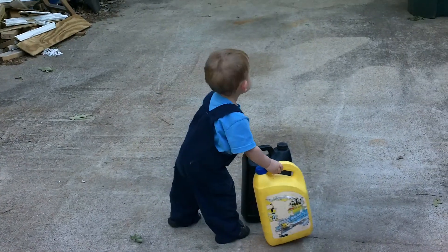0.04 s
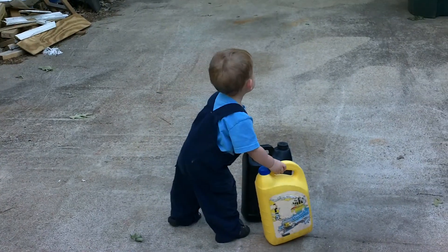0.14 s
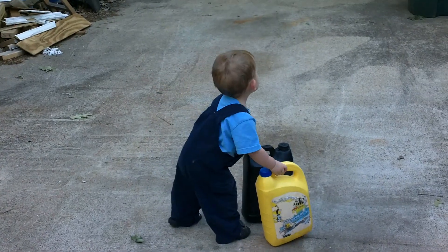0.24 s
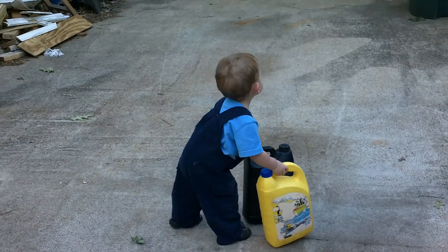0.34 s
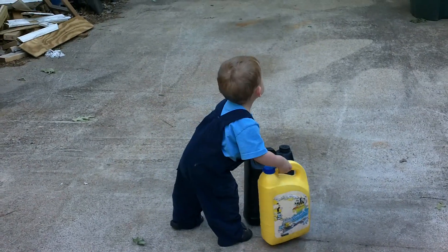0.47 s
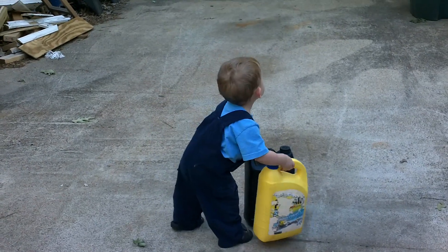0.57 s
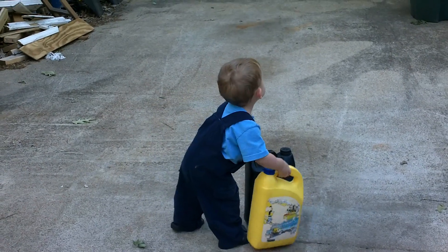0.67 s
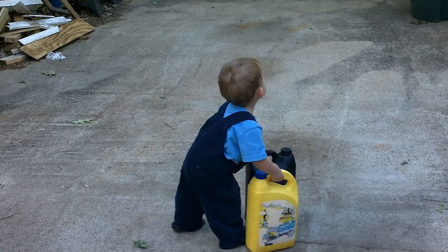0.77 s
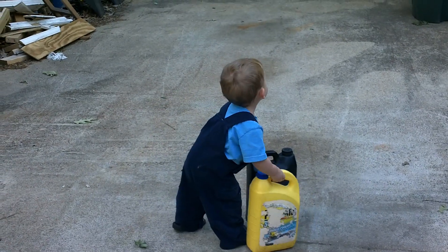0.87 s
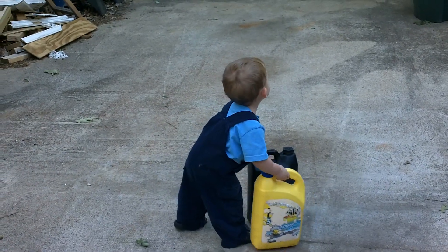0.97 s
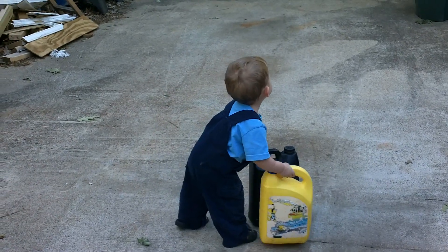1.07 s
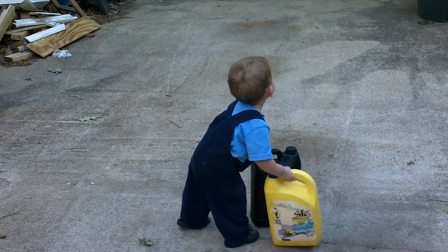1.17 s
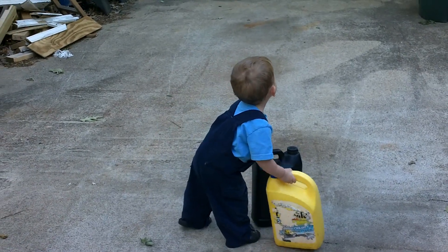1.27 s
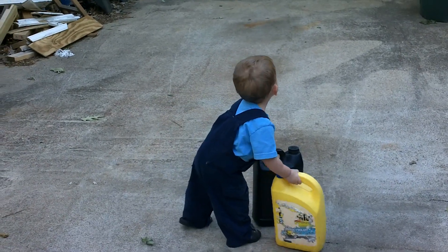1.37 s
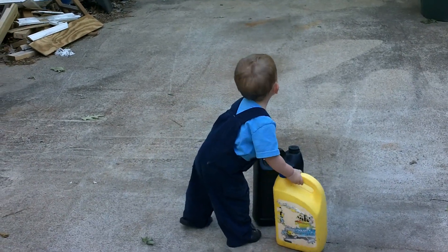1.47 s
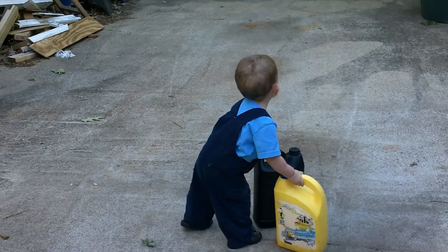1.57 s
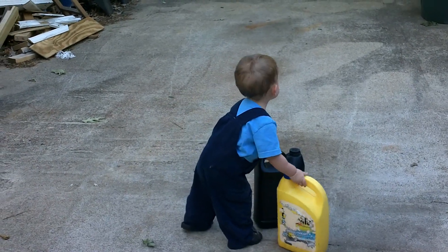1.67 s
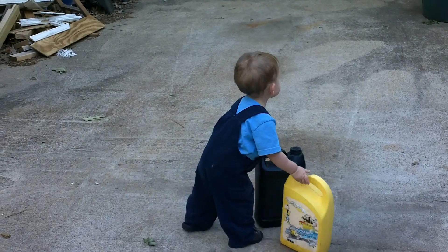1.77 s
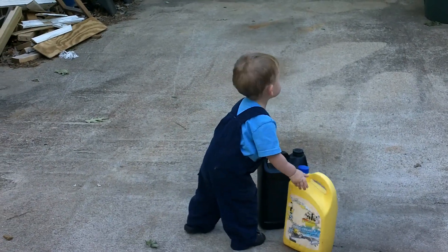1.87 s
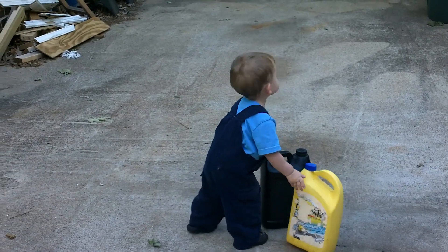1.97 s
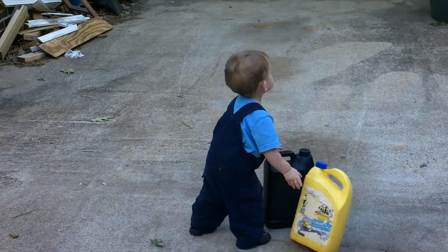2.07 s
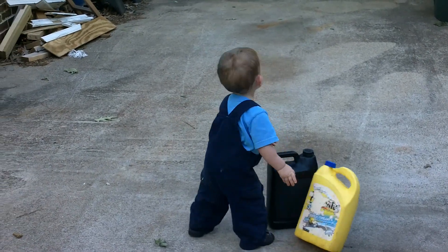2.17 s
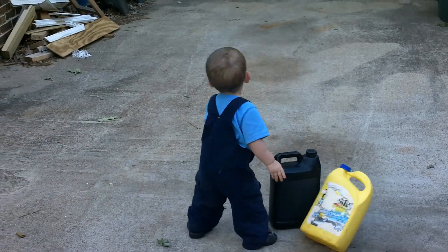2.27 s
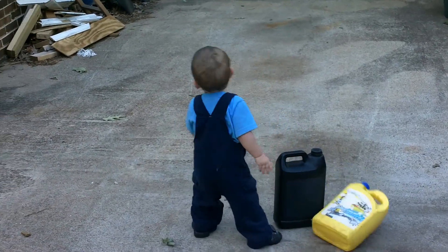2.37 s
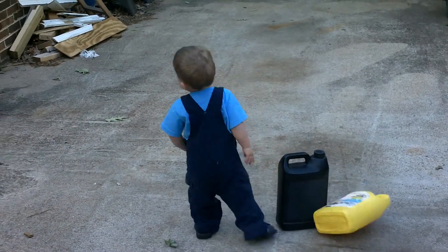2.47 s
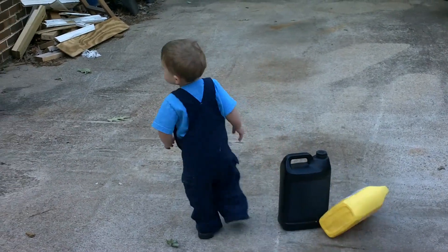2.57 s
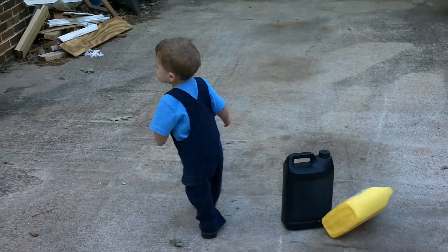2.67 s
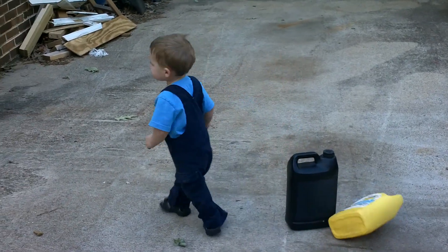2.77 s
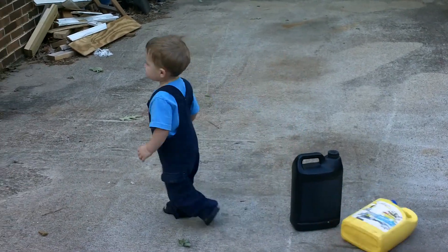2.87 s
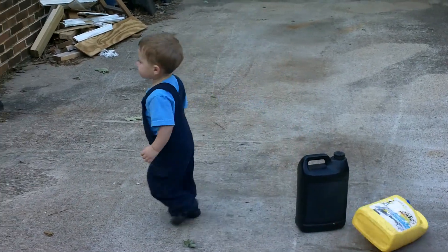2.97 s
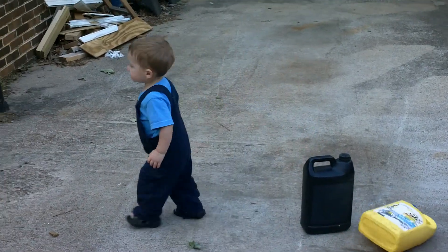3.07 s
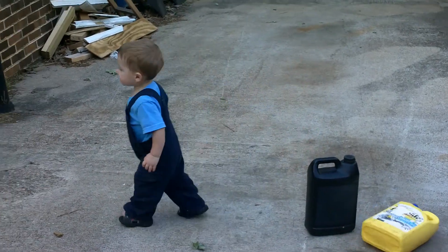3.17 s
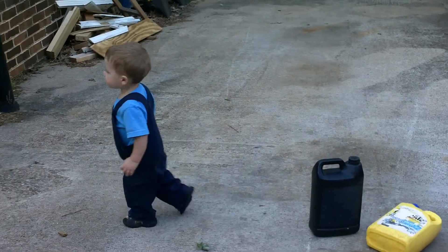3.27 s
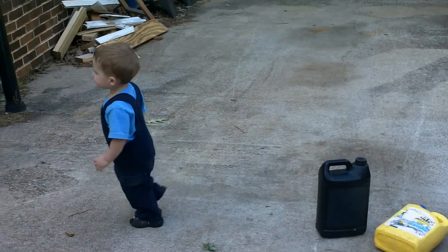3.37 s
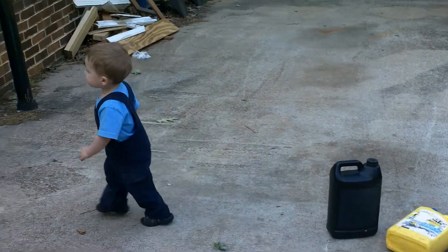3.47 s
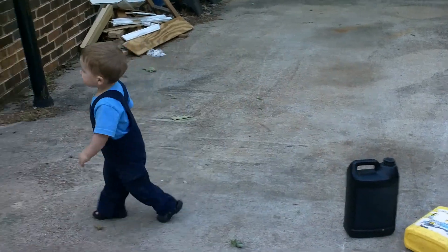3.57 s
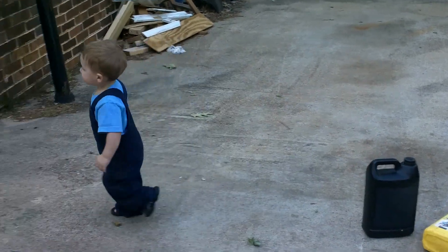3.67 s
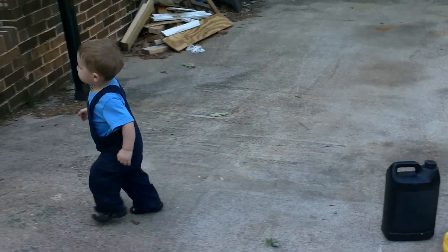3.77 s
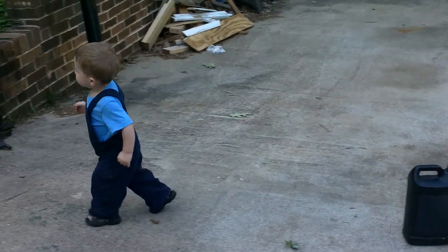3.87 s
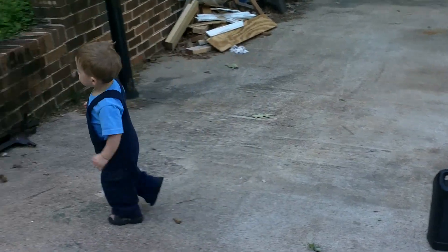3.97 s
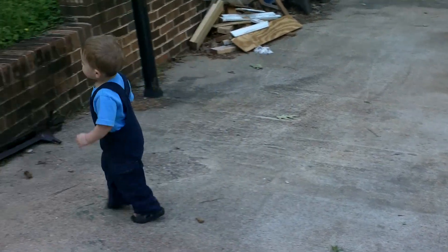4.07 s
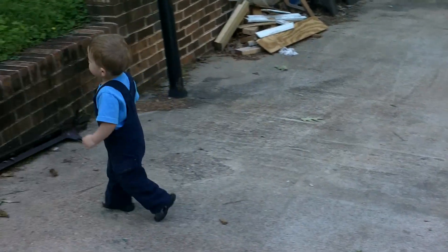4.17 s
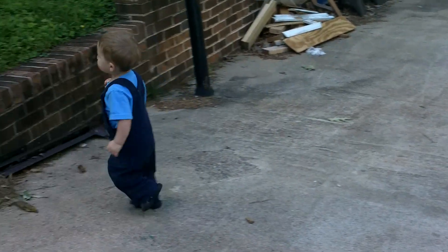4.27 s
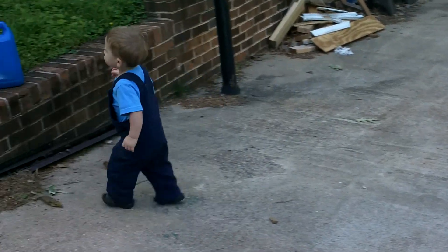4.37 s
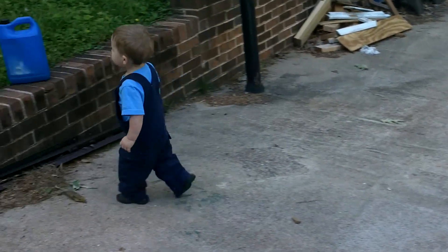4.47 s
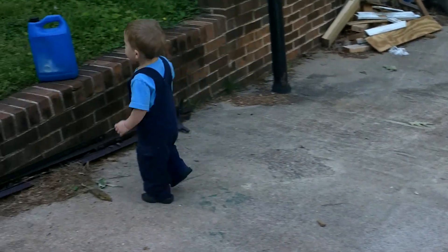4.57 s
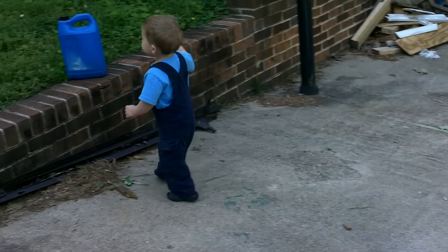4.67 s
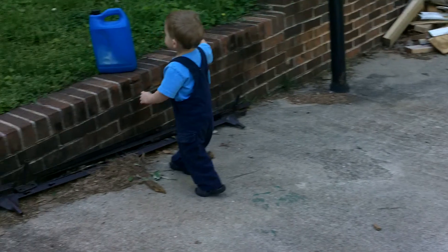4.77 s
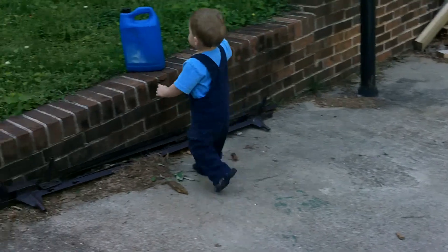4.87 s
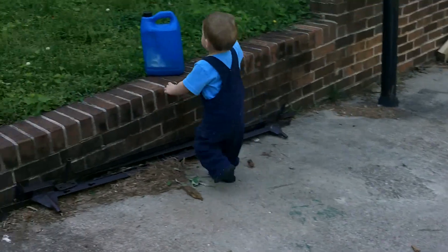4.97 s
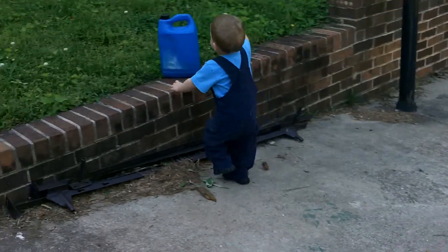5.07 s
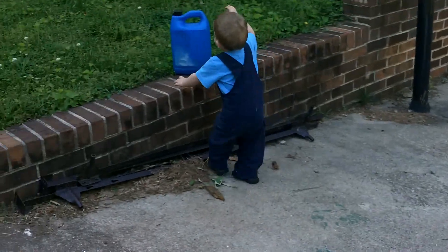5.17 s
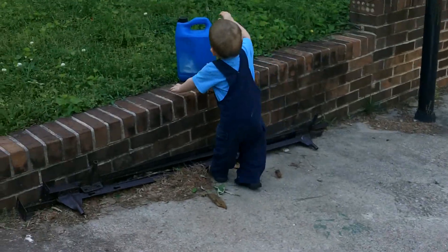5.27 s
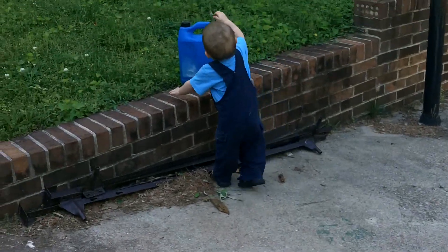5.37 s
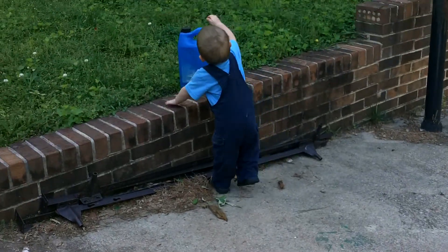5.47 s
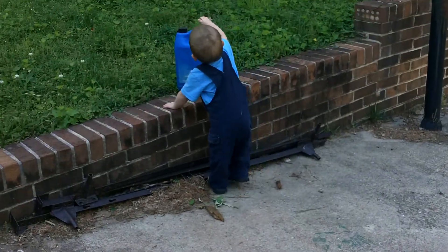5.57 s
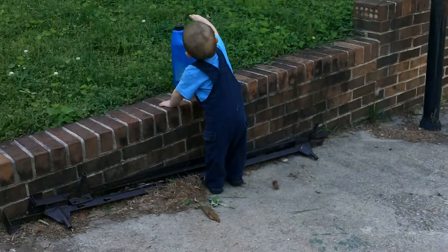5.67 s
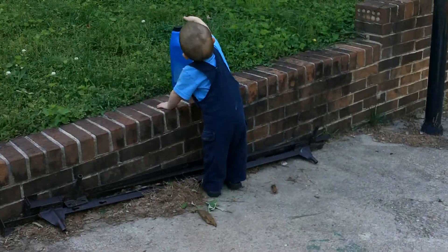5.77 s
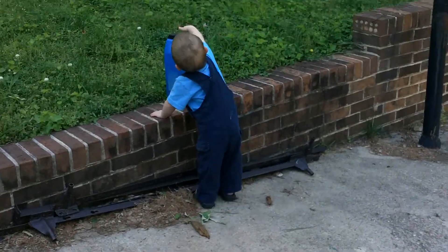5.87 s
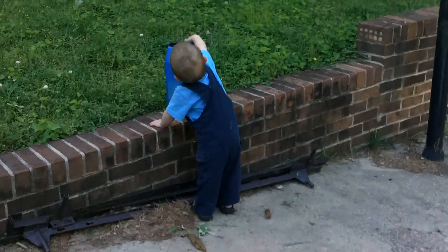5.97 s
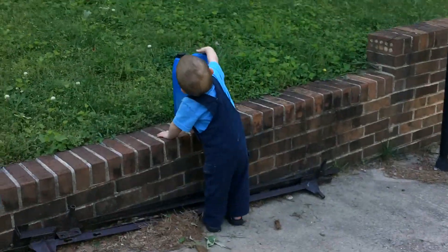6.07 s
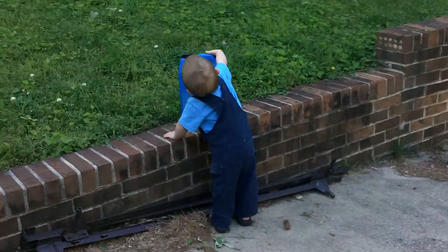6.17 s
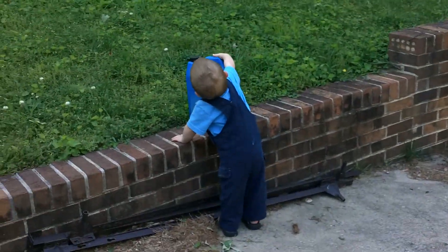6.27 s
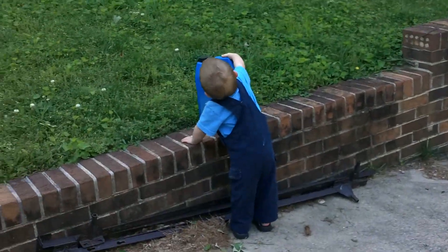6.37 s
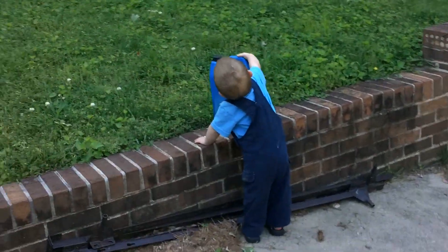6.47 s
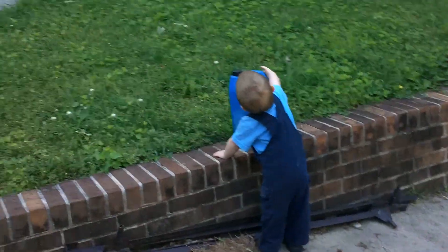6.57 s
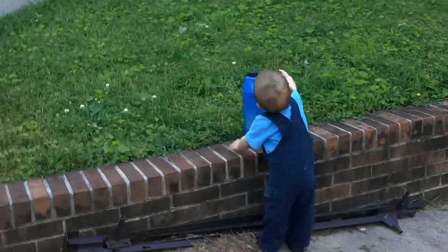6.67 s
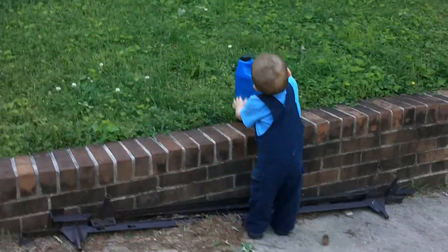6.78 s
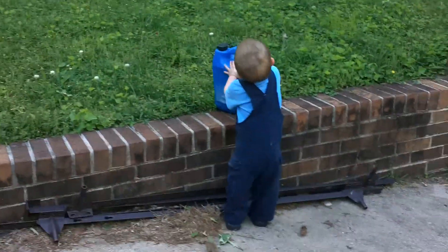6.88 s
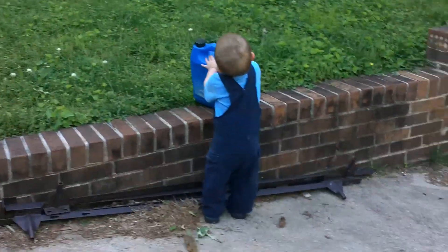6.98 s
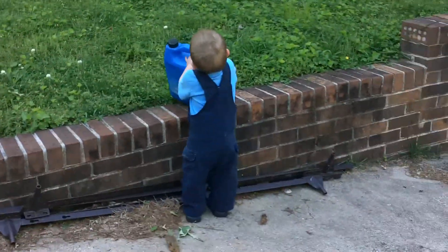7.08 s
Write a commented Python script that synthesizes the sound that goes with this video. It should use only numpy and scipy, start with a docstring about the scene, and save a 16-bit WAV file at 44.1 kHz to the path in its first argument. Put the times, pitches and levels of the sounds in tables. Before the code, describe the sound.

A quiet suburban yard, with distant low wash, faint drone and light hiss. In the first half second there is a soft shoe scuff and quick high bird chirps. At about 0.9 s an empty plastic jug is set down with a dull hollow double knock, a bird whistling just before; a lighter knock comes at 1.35, shoe ticks around 1.2 to 1.8, and very soft low bumps from 1.9 to 2.4. At 2.6 the jug topples: a loud sharp crack with hollow shell ring, then rapid clattering bounces, another strong hit at 3.05, and taps rocking down to nothing by 4.0, with fine grit scraping. Short echoes return from a brick wall. From 4 to 6 s small dry footsteps and scuffs are spaced out, while faint birds twitter and whistle, thinning near 6, then busier to the end. Two barely audible bumps close around 7.0. A small camera microphone hears everything.

```python
"""A concrete drive in a suburb: an empty plastic jug is set down, tips over, bounces and rocks to rest.
Each blow is a noisy crack that rings the jug's shell, its flat side walls and the air inside.
Small shoes tick and grit scrapes as noise bursts; a brick wall throws the blows and ticks back.
Far off, birds whistle as gliding sines over a wash and hiss of shaped noise and a low drone.
A small camera microphone with dips in its response hears it all."""
import sys
import numpy as np
from scipy import signal
from scipy.fft import rfft, irfft, next_fast_len
from scipy.io import wavfile
from scipy.ndimage import uniform_filter1d

SR = 44100
rng = np.random.default_rng(int(sys.argv[2]) if len(sys.argv) > 2 else 0)


def materialize(psi):
    """Save the field psi as 16-bit PCM at rate SR to the path in sys.argv[1].

    A 1-D psi becomes a single channel; in a 2-D psi each row is a channel.
    """
    bounded = np.clip(np.atleast_2d(psi).T, -1, 1)
    quanta = np.round(bounded * 32767).astype(np.int16)
    wavfile.write(sys.argv[1], SR, quanta)


N = 314825
WALL_JUG_DB, WALL_TICK_DB = -16, -11  # brick wall echo against the direct sound


def gain_of(db):
    """Decibels to gain."""
    return 10 ** (np.asarray(db) / 20)


def evened(x):
    """Scales to rms 1."""
    return x / np.sqrt(np.mean(x ** 2) + 1e-20)


def unit_energy(x):
    """Scales so that the squares sum to 1."""
    return x / np.linalg.norm(x)


def read(points, hz):
    """Reads a spectrum on a log-frequency axis."""
    f, value = np.transpose(points)
    return np.interp(np.log(hz + 1), np.log(f + 1), value)


def add(mix, s, sound):
    """Mixes a sound in at time s."""
    part = mix[max(round(s * SR), 0):][:len(sound)]
    part += sound[:len(part)]


def background():
    """Distant wash and hiss: random short-time spectra with faint drifting patches, and the drone."""
    # colour of the background before its slow changes: distant wash and, above about 9 kHz,
    # steady recorder hiss: [f/Hz, level/dB per Hz]
    background_colour = [(20, -71), (40, -70.5), (90, -75), (180, -81), (380, -87.5), (750, -86),
                         (1500, -91), (2600, -96.5), (3700, -100), (5000, -105), (6500, -116), (8000, -124),
                         (10000, -117.5), (15000, -115), (15700, -140)]
    # slow changes of the background:
    # [t/s, change of all below 8 kHz/dB, change of a broad band round 650 Hz/dB, drone level/dB]
    weather = [(0, 2, 0.5, -49), (1, 1, 1, -45.5), (2, 3, 0.5, -52), (2.5, -0.5, 3.5, -49.5),
               (3.5, 3.5, 1.5, -56), (4.3, 3.5, 3.5, -73), (5, 4.5, 1.5, -69), (6, 2, 2.5, -57),
               (6.5, 3, -1, -72), (7.14, 4, -5, -68)]
    hop = 512
    frames, hz = N // hop + 5, np.fft.rfftfreq(2048, 1 / SR)[:, None]
    real, imaginary, patches = rng.standard_normal((frames, 1025, 3)).T
    patches = evened(uniform_filter1d(uniform_filter1d(patches, 20, 0), 8, 1))

    s, *columns = np.transpose(weather)
    frame_s = np.arange(frames) * hop / SR
    whole_db, swell_db, drone_db = (np.interp(frame_s, s, column) for column in columns)
    swell = np.exp(-np.log2(hz / 650 + 1e-3) ** 2 / 2.3) * swell_db
    level_db = read(background_colour, hz) + whole_db * (hz < 8000) + swell + 0.75 * patches
    spectra = (real + 1j * imaginary) * gain_of(level_db)
    air = signal.istft(spectra, nperseg=2048, noverlap=2048 - hop)[1][:N] * np.sqrt(SR / 2048)
    return air + drone() * gain_of(np.interp(np.arange(N), np.arange(frames) * hop, drone_db))


def drone():
    """A steady low tone with slow random wobble of level and phase, rms 1."""
    drone_hz, width_hz = 46.3, 5  # width of each of two equal smoothing stages
    r = np.exp(-np.pi * width_hz / SR)
    wobble = rng.standard_normal((2, N))
    for _ in range(2):
        wobble = signal.lfilter([1 - r], [1, -r], wobble)
    envelope = 3.1 + evened(wobble)[0] + 1j * evened(wobble)[1]
    return evened((envelope * np.exp(2j * np.pi * drone_hz * np.arange(N) / SR)).real)


def ring(t, hz, t60, rise=0.):
    """One dying mode, with a soft start."""
    return gain_of(-60 * t / t60) * (1 - np.exp(-t / (rise + 1e-5))) * np.sin(2 * np.pi * hz * t)


def burst(bright_db, length, snap):
    """A sharp contact in a gritty rush of smaller ones: bare force and its crack, both of unit energy."""
    # colour of the contact crack, before tilt: [f/Hz, level/dB]
    crack_colour = [(200, -13), (700, -4), (1500, 6), (3000, 7), (5000, 0.5), (6800, -11), (8200, -20.5),
                    (10500, -20.5), (14000, -39), (17000, -22)]
    t = np.arange(4096) / SR
    uneven = gain_of(4.4 * rng.standard_normal(4096))
    grit = rng.standard_normal(4096) * uneven * np.exp(-t / max(length, .001))
    grit *= 1 - np.exp(-t / 0.00019)
    grit[30] += snap * np.abs(grit).max()

    hz = np.fft.rfftfreq(4096, 1 / SR)
    octaves = np.clip(np.log2(hz / 2500 + 1e-3), -1, 2.2)
    log_gain = np.log(gain_of(read(crack_colour, hz) + bright_db * octaves))
    full = np.concatenate([log_gain, log_gain[-2:0:-1]])
    causal = np.exp(np.conj(signal.hilbert(full)))[:2049]  # minimum phase: nothing sounds before the contact
    crack = irfft(rfft(grit) * causal)
    dull = uniform_filter1d(crack, size=8)
    crack = dull + (crack - dull) * 0.97 * np.exp(-t / (2.9 * length))  # the treble dies first
    return unit_energy(grit), unit_energy(crack)


def with_yard(sound, wall_db):
    """The sound, its echo smeared by the rough brick wall, and a thin outdoor tail of softened treble."""
    wall_delay_s, tail_db = 0.0353, -16.5
    t = np.arange(SR // 3) / SR
    taps = rng.choice([-1., 1.], len(t)) * (rng.random(len(t)) < .3)
    late = t - wall_delay_s
    bricks = taps * np.exp(-np.abs(late) / np.where(late > 0, .008, .0008))
    tail = signal.lfilter([1], [1, -.4], taps) * gain_of(-60 * t / 0.28) * (t > .006)
    response = gain_of(wall_db) * unit_energy(bricks) + gain_of(tail_db) * unit_energy(tail)
    response[0] = 1  # direct sound
    return signal.fftconvolve(sound, response)


def blows():
    """All blows: main blows, soft bumps (the last two from a second jug) and rocking taps, as rows with the
    columns of main."""
    # blows of the jug from setting down to rocking, with one broad echoing burst after the fall:
    # [t/s, crack level/dB, crack tilt/dB per octave,
    # shell level/dB, air boom level/dB, side wall level/dB, most struck side pitch f/Hz]
    main = [(0.8758, -8.5, -6.5, -4.5, -27, -12.5, 339), (0.8949, -17.5, -5, -11, -55, -30.5, 283),
            (1.3551, -13.5, 2, -8.5, -23, -16, 260), (2.5761, -15, 5, -8, -23, -44, 312),
            (2.5814, 5, 4.5, -6, -36, -26, 290), (2.5881, 9.5, -3, 4.5, -29, -36, 284),
            (2.6101, -14, 9, 0, -15, -21, 297), (2.7223, -15, 8, -2, -14.5, -51, 204),
            (2.7345, -7, 5, -5, -42, -20.5, 305), (2.7863, -23, 1, -11.5, -18, -28, 273),
            (2.861, -17.5, -0.5, -12.5, -32, -37, 274), (2.8994, -20, -1.2, -16, -31, -30, 280),
            (2.9246, -37, 11, -33, -25, -38, 270), (2.9355, -18, 2, -17.5, -26, -42, 288),
            (2.9573, -14.5, .4, -28, -29.5, -41, 200), (2.9765, -23, 3, -28, -53, -37.5, 258),
            (3.0305, -17, 1.9, -14, -50, -45, 336), (3.046, 4, 3.5, 0.5, -22, -32.5, 232),
            (3.1317, -16, 7.5, -9.5, -21, -32, 275), (3.1837, -13.5, -4, -11.5, -20.5, -34, 250),
            (3.2245, -14, -5, -11.5, -25, -47, 204), (3.2615, -17, -0.5, -14.5, -33, -45, 240),
            (3.2952, -12.5, 4.5, -22, -23.5, -32, 205), (3.3066, -7.5, 0.3, -5.5, -19.5, -31.5, 248)]
    # soft low bumps: the first a knock's dying end, the last two a thump of a second jug nearby: # [t/s, air
    # boom level/dB, side wall level/dB, most struck side pitch f/Hz]
    bumps = [(0.0034, -42.5, -36.5, 264), (1.8988, -46.5, -44.5, 274), (1.9683, -41, -39, 314),
             (2.0265, -35, -31.5, 196), (2.0518, -42, -34, 190), (2.1567, -40, -39, 272),
             (2.187, -54, -41.5, 265), (2.2884, -46.5, -44.5, 258), (2.4402, -50, -44, 267),
             (6.9986, -40.5, -44.5, 227), (7.025, -47, -44.5, 213)]
    # taps as the jug rocks to rest on its side: [t/s, crack level/dB]
    rocks = [(3.3911, -7.5), (3.4388, -6.5), (3.491, -7.5), (3.539, -9), (3.579, -9), (3.6289, -15),
             (3.6551, -12), (3.706, -14), (3.7592, -15), (3.799, -19), (3.823, -14.5), (3.884, -18),
             (3.914, -21), (3.989, -23)]
    rows = list(main)
    for s, boom_db, side_db, side_hz in bumps:
        rows.append((s, side_db + 10, -9.5, side_db + 11, boom_db, side_db, side_hz))
    for s, crack_db in rocks:
        rows.append((s, crack_db, -1.5, crack_db - 1.5, crack_db - 24, crack_db - 29.5, 284))
    return rows


def rattle(force, flat):
    """The shell driven by the contact force: a few strong modes and a crowd of small ones, unit energy."""
    # upper modes of the jug's shell, before the shift of each blow; t60 is held to 0.07 s at most:
    # [f/Hz, level/dB, t60/s]
    shell_modes = [(375, 0.5, 0.1), (436, -3.5, 0.079), (490, -21.5, 0.13), (544, 1.5, 0.031),
                   (603, -10, 0.12), (727, -1.5, 0.18), (886, -2.5, 0.12), (970, -20, 0.022),
                   (1150, -0.5, 0.028), (1543, -2.5, 0.025)]
    damp_db, damp_below_hz = -6, 690  # lying flat damps the shell's lower modes
    t = np.arange(4096) / SR
    spot = rng.standard_normal((2, len(shell_modes)))  # where it lands shifts the modes
    modes = np.zeros(4096)
    for (hz, db, t60), level_shift, pitch_shift in zip(shell_modes, *spot):
        mode_db = db + 1.4 * level_shift + flat * damp_db * (hz < damp_below_hz)
        modes += gain_of(mode_db) * ring(t, hz * (1 + 0.037 * pitch_shift), min(t60, .07))

    # many small modes of ribs and corners
    band = signal.butter(2, [300, 1100], "band", fs=SR)
    crowd = signal.lfilter(*band, rng.standard_normal(4096)) * gain_of(-60 * t / 0.094)
    modes = evened(modes) + 0.94 * gain_of(flat * damp_db) * evened(crowd)
    return unit_energy(signal.fftconvolve(force, modes)[:4096])


def drum_of(boom_db, side_db, side_hz, flat):
    """Air boom, lower when the jug lies flat, and side wall modes, loudest near the struck pitch."""
    # close cluster of modes of the flat side walls: [f/Hz, level/dB, t60/s]
    side_modes = [(205, -6.5, 0.3), (248.3, 5, 0.095), (283.9, 3.5, 0.15), (313.4, -6, 0.17)]
    boom_free_hz, boom_flat_hz = 149.5, 116
    t = np.arange(int(.4 * SR)) / SR
    side = np.zeros(len(t))
    for hz, db, t60 in side_modes:
        side += gain_of(db - 8.1 * ((hz - side_hz) / 55) ** 2) * ring(t, hz, t60, rise=0.0041)
    boom = ring(t, boom_free_hz + (boom_flat_hz - boom_free_hz) * flat, t60=0.28, rise=0.0088)
    return gain_of(boom_db) * boom + gain_of(side_db) * side


def jug():
    """Each blow cracks, rattles the shell and drums the air inside and the flat side."""
    settle_s, settle_time_s, flat_until_s = 3.32, 0.065, 4.5
    out = np.zeros(N)
    for s, crack_db, tilt_db, shell_db, boom_db, side_db, side_hz in blows():
        force, crack = burst(tilt_db, length=0.0068, snap=0.89)
        # 0 standing free, 1 settled flat
        flat = (s < flat_until_s) / (1 + np.exp(min((settle_s - s) / settle_time_s, 50)))
        knock = gain_of(crack_db) * crack + gain_of(shell_db) * rattle(force, flat)
        add(out, s, with_yard(knock, WALL_JUG_DB))
        drum = drum_of(boom_db, side_db, side_hz, flat)
        add(out, s + .002, drum)
        add(out, s + 0.03802, 0.21 * drum)  # the wall returns the low drum too
    return out


def ticks():
    """Shoes and grit on hard ground: short scuffs of noise without any hollow ring."""
    # ticks on the concrete: [t/s, level/dB, tilt/dB per octave, scuff length/s]
    scuffs = [(0.12, -21.5, -8, 0.028), (0.161, -25, -10, 0.012), (1.217, -21, 0, 0.019),
              (1.5088, -13, -3, 0.0092), (1.787, -17, 1.2, 0.009), (4.019, -20.5, -1.5, 0.018),
              (4.2856, -26.5, 5.5, 0.013), (4.31, -15.5, 3, 0.0026), (4.556, -24, 1, 0.015),
              (4.586, -15.5, 4, 0.0041), (4.849, -19.5, -15, 0.026), (5.414, -33, 19, 0.019),
              (5.4357, -12, -2.5, 0.014), (5.7886, -27, 17, 0.016), (5.803, -16, 10, 0.014),
              (5.957, -32.5, 29, 0.0014)]
    out = np.zeros(N)
    for s, level_db, tilt_db, length in scuffs:
        crack = burst(tilt_db, length, snap=0.58)[1]
        add(out, s, with_yard(gain_of(level_db) * crack, WALL_TICK_DB))
    return out


def note(hz, level_db, unrest):
    """A near sine along a pitch curve, wavering in pitch and level."""
    t = np.arange(len(hz)) / SR
    drifts = rng.standard_normal((2, len(t)))
    waver, flutter = (unrest * evened(uniform_filter1d(drift, size=400)) for drift in drifts)
    edges = np.clip(np.minimum(t, t[-1] - t) / .005, 0, 1)
    phase = 2 * np.pi * np.cumsum(hz * (1 + .0025 * waver)) / SR
    return np.sqrt(2) * edges * gain_of(level_db + 1.45 * flutter) * np.sin(phase)


def twitter():
    """A faint chorus of short notes at chance times and pitches, as rows with the columns of whistles."""
    # spells of far twitter: [from t/s, to t/s, number of notes]
    chorus = [(4, 5.4, 70), (5.4, 6.45, 25), (6.45, 7.14, 80)]
    low_hz, high_hz, loudest_db = 2200, 3800, -69
    notes = []
    for from_s, to_s, count in chorus:
        start, length, pitch, slide, size = rng.random((count, 5)).T
        held_hz = low_hz * (high_hz / low_hz) ** pitch
        start_s = from_s + start * (to_s - from_s)
        start_hz = held_hz * (.92 + .16 * slide)
        notes += zip(start_s, .02 + .06 * length, start_hz, held_hz, loudest_db - 6 * size)
    return notes


def birds():
    """Arched chirps and sliding whistles, with the twitter behind them, all blurred by distance."""
    # quick chirps, each one or both flanks of an arch of pitch:
    # [top t/s, rise/s, fall/s, top f/Hz, level/dB]
    chirps = [(.289, .024, .001, 3500, -63), (.323, .033, .001, 3250, -59), (.364, .034, .001, 3250, -59),
              (.377, .014, .017, 3650, -61), (.352, .001, .05, 2600, -61), (.476, .018, .016, 3530, -60),
              (.95, .04, .045, 2760, -62.5), (1.079, .014, .018, 3580, -60), (1.28, .025, .016, 3650, -63),
              (1.3, .001, .06, 2800, -63)]
    # whistles that slide onto a held pitch: [t/s, length/s, start f/Hz, held f/Hz, starting level/dB]
    whistles = [(.46, .17, 2050, 2050, -69), (.61, .24, 4500, 4500, -75), (.783, .1, 3950, 2735, -55.5),
                (.93, .22, 2740, 2740, -64.5), (1.18, .12, 2740, 2740, -67), (4.1, .2, 2700, 2650, -66),
                (4.6, .22, 2900, 2750, -65), (5.03, .27, 3500, 3660, -65), (5.15, .2, 2780, 2660, -63),
                (5.22, .1, 2350, 2260, -65), (5.72, .08, 3000, 3050, -65), (5.84, .3, 2680, 2610, -68),
                (6.18, .15, 2460, 2530, -59), (6.37, .11, 2540, 2580, -64), (6.7, .13, 1900, 2370, -62),
                (6.7, .1, 3450, 3410, -66), (6.82, .1, 4780, 4760, -72), (6.84, .04, 2900, 2780, -62),
                (6.88, .1, 2750, 2600, -60), (7.04, .08, 2650, 2620, -66)]
    arch_hz, slide_s = 650, .014  # drop from top to ends of a chirp; time constant of a slide
    fade_db = -2.5  # over the length of a whistle
    clear_db, unrest_per_db = -57, .35  # fainter singers are farther off and waver more
    out = np.zeros(N)
    for top_s, rise, fall, top_hz, db in chirps:
        t = np.arange(-rise, fall, 1 / SR)
        hz = top_hz - arch_hz * (t / np.where(t < 0, rise, fall)) ** 2
        add(out, top_s - rise, note(hz, db, unrest=1.0))
    for s, length, start_hz, held_hz, db in list(whistles) + twitter():
        t = np.arange(0, length, 1 / SR)
        hz = held_hz + (start_hz - held_hz) * np.exp(-t / slide_s)
        unrest = min(1 + unrest_per_db * (clear_db - db), 3.5)
        add(out, s, gain_of(np.linspace(0, fade_db, len(hz))) * note(hz, db, unrest))

    t = np.arange(SR // 4) / SR
    blur = rng.standard_normal(len(t)) * gain_of(-60 * t / 0.31)
    return out + gain_of(-9.) * signal.fftconvolve(out, unit_energy(blur))[:N]


def scrape():
    """Grit under the tumbling jug: dense grains of uneven size, each one of several tiny cracks."""
    # slow level of the scraping, near silent outside its span: [t/s, level/dB]
    scrape_level = [(2.5, -75), (2.6, -50), (2.85, -58), (3.02, -67), (3.1, -62), (3.6, -57), (3.9, -61),
                    (4.15, -61.5)]
    grains_per_s, kinds = 2500, 10
    s, db = np.transpose(scrape_level)
    size = gain_of(3.5 * np.minimum(rng.exponential(1, N), 5))
    grains = size * (rng.random(N) < grains_per_s / SR) * rng.choice([-1., 1.], N)
    kind = rng.integers(0, kinds, N)
    rush = np.zeros(N)
    for k in range(kinds):
        tiny_crack = burst(0.6, length=0.001, snap=1.5)[1][:600]
        rush += signal.oaconvolve(grains * (kind == k), tiny_crack)[:N]
    return evened(rush) * gain_of(np.interp(np.arange(N) / SR, s, db, left=-120, right=-120))


def scene():
    """Close blows and ticks with their echoes over the far background."""
    return (background() + jug() + ticks() + birds() + scrape())[None]


def record(dry):
    """The microphone's dips, then the band limit."""
    # dips in the microphone's response, a negative depth being a peak: [f/Hz, half width/Hz, depth/dB]
    dips = [(4215, 95, 26), (4900, 220, -3.5), (7850, 300, 16), (8780, 220, 18), (12620, 250, 20),
            (16000, 500, 8)]
    edge_hz = 16400
    size = next_fast_len(N + 4096)
    hz = np.fft.rfftfreq(size, 1 / SR)
    dips_db = sum(db / (1 + ((hz - f) / width) ** 2) for f, width, db in dips)
    coloured = irfft(rfft(dry, size) * gain_of(-dips_db), size)[:, :N]
    low_pass = signal.firwin(511, edge_hz, window=("kaiser", 9), fs=SR)
    return signal.oaconvolve(coloured, low_pass[None], "same")


dry = scene()
out = record(dry)
materialize(out)
```